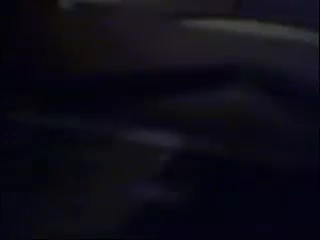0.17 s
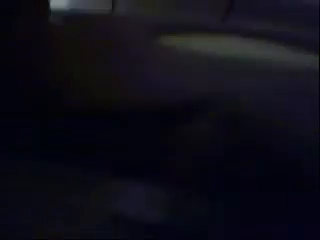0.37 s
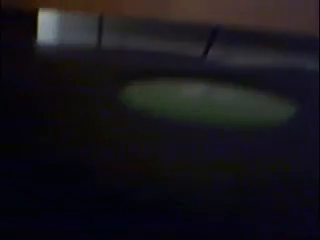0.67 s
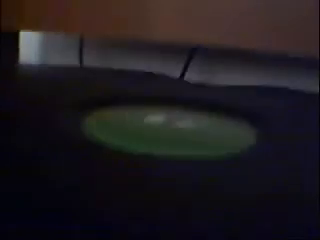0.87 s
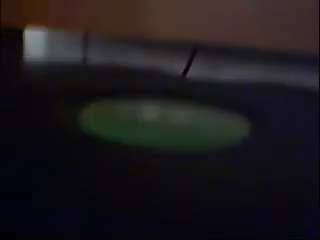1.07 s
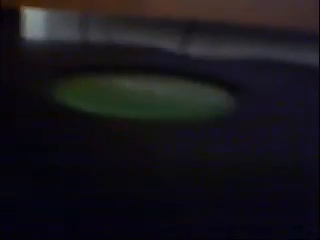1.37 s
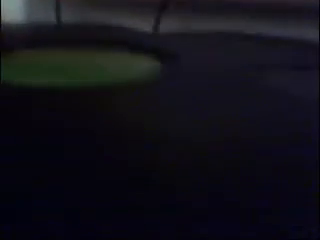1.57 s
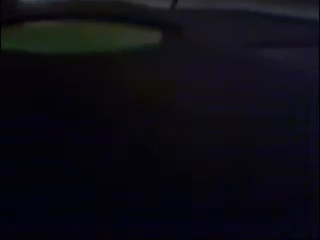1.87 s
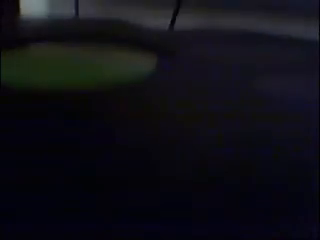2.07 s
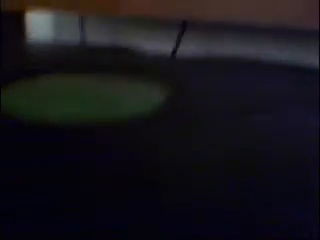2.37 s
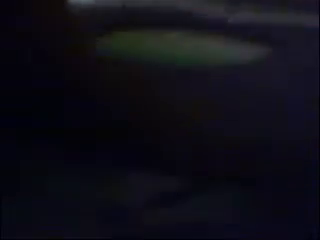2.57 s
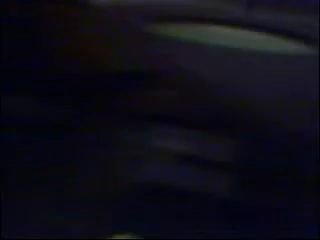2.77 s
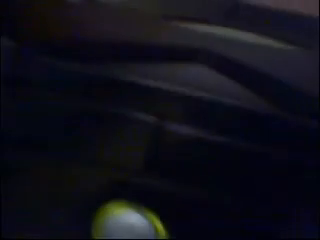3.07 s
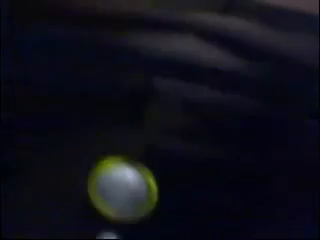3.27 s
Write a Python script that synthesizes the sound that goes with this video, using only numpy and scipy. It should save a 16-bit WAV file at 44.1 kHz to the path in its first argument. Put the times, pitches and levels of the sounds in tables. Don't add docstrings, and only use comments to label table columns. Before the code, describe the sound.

A small cooling fan whirs continuously in a plastic case, its jet buffeting a very close microphone with deep rumble; behind it are airy whoosh, a tonal hum and faint rattle, rising slightly near the end.

```python
import sys
import numpy as np
from scipy import signal
from scipy.io import wavfile
from scipy.ndimage import uniform_filter1d

SR = 44100
rng = np.random.default_rng(int(sys.argv[2]) if len(sys.argv) > 2 else 0)


def voltage_ratio(level):
    return 10 ** (np.asarray(level, float) / 20)


def generate_wav(signal):
    frames = np.transpose(np.atleast_2d(signal))
    scaled = np.clip(frames, -1, 1) * 32767
    pcm = np.round(scaled).astype(np.int16)
    wavfile.write(sys.argv[1], SR, pcm)


N = 151263

# f/Hz, level/dB rms
COIL_WHINES = [(3079, -70), (3470, -70), (3505, -70), (4060, -69), (4337, -69), (4673, -72), (5063, -75),
               (4770, -75), (5639, -74), (5840, -78), (6320, -79), (6460, -79), (6655, -82), (7044, -80),
               (7166, -86), (7864, -86), (8212, -84), (8312, -86), (8672, -87), (8955, -82), (8993, -83),
               (10088, -86), (10160, -87), (10478, -76), (10496, -85), (10549, -78), (10868, -84)]
COIL_DB = -2.5

# t/s, rate/Hz
KNOCK_RATE = [
    (0, 44.5),
    (1.75, 44.76),
    (2.2, 35.7),
    (2.8, 35.24),
    (3.43, 42.5),
]
# f/Hz, level/dB, t60/s
RATTLE_MODES = [(3930, -1, .026), (4070, 1.5, .018), (4310, -1.5, .022), (4590, -4, .015), (2590, -2, .022),
                (6200, -21, .015)]
RATTLE_DB, KNOCK_SPREAD_DB = -55.5, 1.0
KNOCK_S, KNOCK_JITTER_TURNS = 0.011, 0.2
RATTLE_FROM_S = 0.16

# t/s, turns per second/Hz
SHAFT_SPEED = [(0, 39.93), (.65, 39.84), (1.0, 39.79), (1.55, 39.74), (2.17, 39.74), (2.25, 40.0),
               (2.45, 41.12), (2.63, 41.87), (2.83, 42.53), (3.03, 43.01), (3.23, 43.4), (3.43, 43.72)]
# f/Hz, width/Hz, level/dB
HOUSING_MODES = [(1362, 80, -51.5), (1420, 70, -51), (1595, 70, -63), (2482, 90, -54.5), (2550, 70, -69),
                 (1200, 80, -60), (2170, 70, -67), (1750, 70, -66)]
POLE_LEVELS = [0, -5, -2, -3]
BLADE_ORDER, SLOT_ORDER = 9, 36
BLADE_DB, SLOT_DB, BLADE_OVERTONE_DB = -43, -52.5, -9
BLADE_DB_PER_HZ, SLOT_DB_PER_HZ = 1.5, -0.6
WAVER_DB, BLADE_FLUTTER_DB = 0.7, 1.2

# f/Hz, level/dB per Hz
WHOOSH_SPECTRUM = [(290, -16), (500, -1), (1420, -8.5), (3650, -17), (4010, -16), (10500, -40),
                   (12700, -36.5), (16500, -81.5), (22000, -120)]
# f/Hz, width/Hz, lift/dB
DUCT_MODES = [(903, 57, 3), (1136, 130, 4), (1340, 80, 2), (2500, 170, -0.5), (3150, 100, 2),
              (4050, 450, -2.5), (6310, 490, 4), (8700, 710, 3.5), (10380, 1200, 6)]
WHOOSH_DB, FLICKER_DB, GUST_DB = -41, 0.34, -0.5
WHOOSH_DB_PER_HZ, WHOOSH_TILT_HZ = 1.13, 1800

# t/s, level/dB
JET_STRENGTH = [(0.05, -17), (0.58, -20), (0.94, -17), (1.48, -19.5), (1.55, -14), (1.63, -19), (2.28, -18),
                (2.3, -22), (2.35, -14), (2.53, -24.5), (2.55, -15.5), (2.88, -18.5), (2.92, -14.5),
                (3.1, -18.5), (3.14, -15), (3.38, -15.5)]
# f/Hz, level/dB per Hz
BUFFET_SPECTRUM = [(7.1, -35.5), (12, 1), (65, 0), (132, -3), (326, -22), (367, -23), (700, -39.5),
                   (910, -72), (1540, -120)]
# t/s, peak level/dB, f/Hz
SHARP_EDDIES = [(0.311, -22, 151), (0.396, -16.5, 151), (0.743, -11.5, 221), (0.769, -20, 151),
                (0.918, -10.5, 154), (1.2, -17, 161), (1.257, -11.5, 150), (1.542, -11, 162),
                (1.571, -8.5, 140), (2.069, -8.5, 205), (2.097, -10, 156), (2.345, -24, 185),
                (2.608, -14.5, 217), (2.677, -9.5, 160), (2.905, -10, 152), (3.07, -34, 151),
                (3.172, -11.5, 150), (3.239, -14, 154)]
EDDY_DB, EDDY_TURNS = -1.5, 0.678
BUFFET_DB, LUMP_DB, PATCH_DB = 0.5, 2, 0.85
LUMP_ABOVE_HZ, JET_SMOOTH_S = 112, 0.06
STEADY, STEADY_S = 0.62, 0.08
BULGE = 0.27

# f/Hz, share missing (0-1)
TREBLE_LOSS = [(6800, 0), (7300, .1), (8200, .03), (9300, .08), (10300, .06), (11100, .4), (12000, .6),
               (12500, .5), (12850, .7)]
OFFSET = 0.004


def evened(x):
    return x / np.sqrt(np.mean(x ** 2) + 1e-20)


def curve(points):
    return np.interp(np.arange(N) / SR, *np.transpose(points))


def drift(top_hz):
    t = np.arange(0, N + 64, 64) / SR
    slow = 0
    for f in np.geomspace(top_hz / 20, top_hz, 24):
        slow = slow + np.sin(2 * np.pi * (f * t + rng.random())) / np.sqrt(f)
    return np.interp(np.arange(N) / SR, t, evened(slow))


def air(spectrum, bumps, patch_db, size):
    hop, hz = size // 4, np.fft.rfftfreq(size, 1 / SR)
    real, imag, patches = rng.standard_normal((N // hop + 6, len(hz), 3)).T
    patches = uniform_filter1d(patches, size=8, axis=0)
    patches = evened(uniform_filter1d(patches, size=8, axis=1))
    f, level = np.transpose(spectrum)
    db = np.interp(np.log(hz + 1), np.log(f + 1), level)
    for centre, width, lift in bumps:
        db = db + lift / (1 + (2 * (hz - centre) / width) ** 2)
    z = (real + 1j * imag) * voltage_ratio(db[:, None] + patch_db * patches)
    noise = signal.istft(z, nperseg=size, noverlap=3 * hop)[1]
    return evened(noise[size // 2:size // 2 + N])


def tone(turns, db):
    level = voltage_ratio(db + WAVER_DB * drift(top_hz=29.56))
    return np.sqrt(2) * level * np.sin(2 * np.pi * (turns + rng.random()))


def coils():
    t = np.arange(N) / SR
    return sum(tone(hz * t, db + COIL_DB) for hz, db in COIL_WHINES)


def rattle():
    phase = np.cumsum(curve(KNOCK_RATE)) / SR + KNOCK_JITTER_TURNS * drift(top_hz=39.07)
    knocks = np.diff(np.floor(np.maximum.accumulate(phase)), prepend=0)
    hits = knocks * voltage_ratio(KNOCK_SPREAD_DB * rng.standard_normal(N))
    t = np.arange(2000) / SR
    swell = t * np.exp(-t / KNOCK_S * 2)
    scrape = signal.oaconvolve(hits, swell)[:N] * rng.standard_normal(N)
    ring = 0
    for k, (hz, db, t60) in enumerate(RATTLE_MODES):
        ring = ring + (-1) ** k * voltage_ratio(db - 60 * t / t60) * np.sin(2 * np.pi * hz * t)
    early = np.arange(N) < RATTLE_FROM_S * SR
    return voltage_ratio(RATTLE_DB - 10 * early) * evened(signal.oaconvolve(scrape, ring)[:N])


def rotor(shaft, faster):
    turns = np.cumsum(shaft) / SR
    flutter = BLADE_FLUTTER_DB * drift(top_hz=50.07)
    out = tone(BLADE_ORDER * turns, BLADE_DB + BLADE_DB_PER_HZ * faster + flutter)
    out = out + tone(SLOT_ORDER * turns, SLOT_DB + SLOT_DB_PER_HZ * faster)
    even_orders = set(range(20, 66, 2)) - {SLOT_ORDER}
    for k in sorted(even_orders | {7 * BLADE_ORDER}):
        lift = 0
        for hz, width, db in HOUSING_MODES:
            lift = lift + voltage_ratio(db) / (1 + (2 * (k * shaft - hz) / width) ** 2) ** 2
        db = BLADE_OVERTONE_DB if k % 2 else POLE_LEVELS[k // 2 % 4]
        out = out + lift * tone(k * turns, db)
    return out


def whoosh(faster, gusts):
    flow = air(WHOOSH_SPECTRUM, DUCT_MODES, 0.89, size=1024)
    flow = flow * voltage_ratio(WHOOSH_DB + FLICKER_DB * drift(top_hz=42.2))
    low = signal.lfilter(*signal.butter(1, WHOOSH_TILT_HZ, fs=SR), flow)
    return flow + (voltage_ratio(WHOOSH_DB_PER_HZ * faster + GUST_DB * gusts) - 1) * low


def buffet(gusts):
    smooth = round(JET_SMOOTH_S * SR)
    roll = air(BUFFET_SPECTRUM, [], PATCH_DB, size=2048)
    power = uniform_filter1d(roll ** 2, round(STEADY_S * SR))
    roll = evened(roll / (power + 0.05) ** (STEADY / 2))
    top = roll - signal.filtfilt(*signal.butter(2, LUMP_ABOVE_HZ, fs=SR), roll)
    lumpy = roll + (voltage_ratio(LUMP_DB * gusts) - 1) * top
    out = voltage_ratio(BUFFET_DB + uniform_filter1d(curve(JET_STRENGTH), smooth)) * lumpy
    for s, db, hz in SHARP_EDDIES:
        t = np.arange(N) / SR - s - EDDY_TURNS / hz
        puff = np.exp(-(t * hz / EDDY_TURNS) ** 2)
        out = out + voltage_ratio(db + EDDY_DB) * puff * np.cos(2 * np.pi * hz * t - 0.6)
    return out + BULGE * (out ** 2 - uniform_filter1d(out ** 2, smooth))


def thin_treble(x):
    hz, t, z = signal.stft(x, SR, nperseg=2048, noverlap=1536)
    bands = len(hz) // 2 + 1
    draw = rng.random((len(t) // 16 + 2, bands))
    when = (np.arange(len(t))[:, None] + rng.integers(0, 16, bands)) // 16
    draw = np.take_along_axis(draw, when, axis=0)
    draw = np.repeat(draw, 2, axis=1)[:, :len(hz)].T
    kept = draw > np.interp(hz, *np.transpose(TREBLE_LOSS))[:, None]
    return signal.istft(z * kept, SR, nperseg=2048, noverlap=1536)[1][..., :N]


def scene():
    shaft, gusts = curve(SHAFT_SPEED), drift(top_hz=39.8)
    faster = shaft - shaft.min()
    machine = coils() + rattle() + rotor(shaft, faster)
    return (machine + whoosh(faster, gusts) + buffet(gusts))[None]


def band_limit(x):
    return signal.sosfilt(signal.butter(12, 12810, fs=SR, output="sos"), x)


def record(dry):
    mix = thin_treble(dry + OFFSET)
    return band_limit(mix)


dry = scene()
out = record(dry)
generate_wav(out)
```